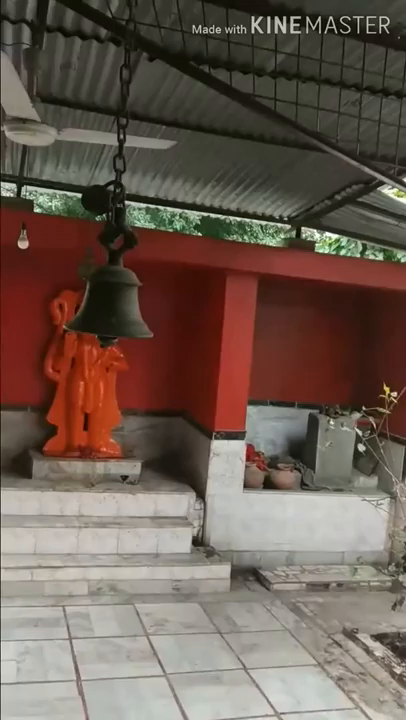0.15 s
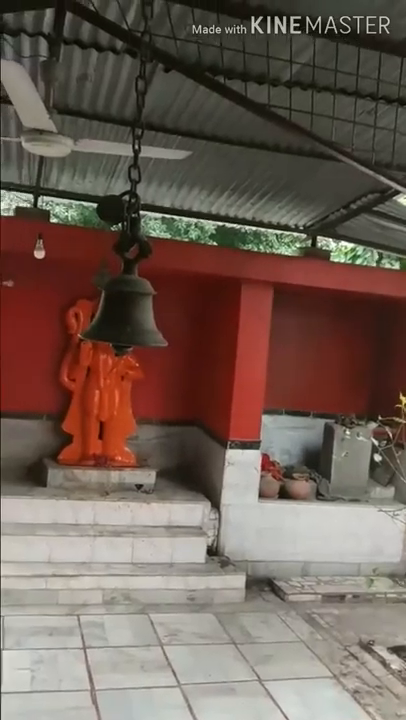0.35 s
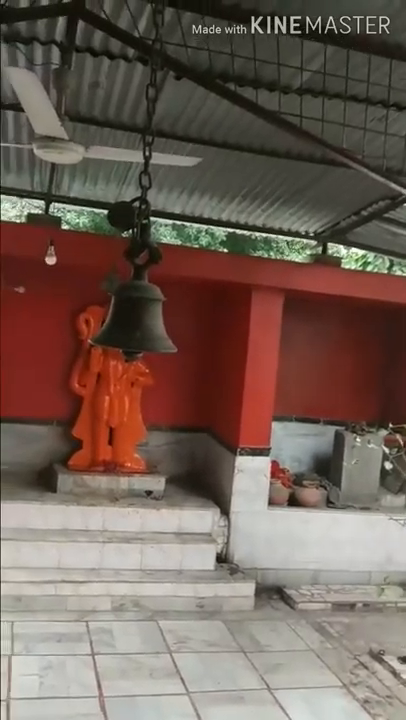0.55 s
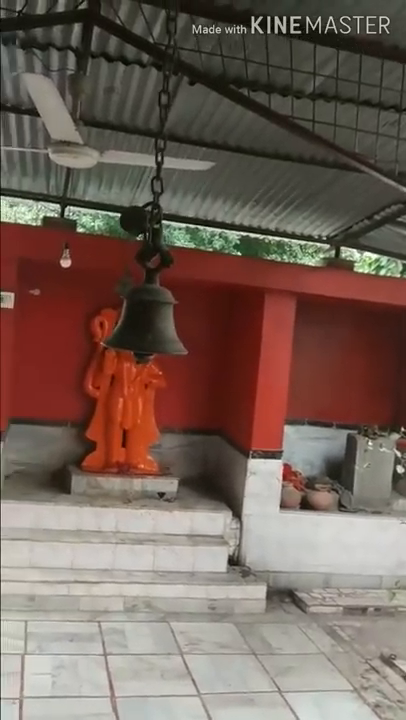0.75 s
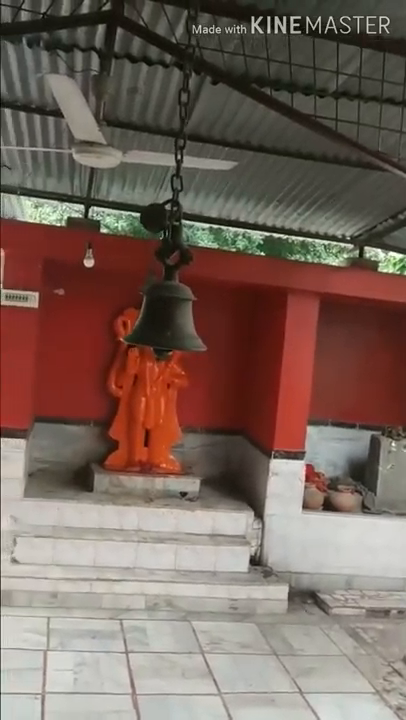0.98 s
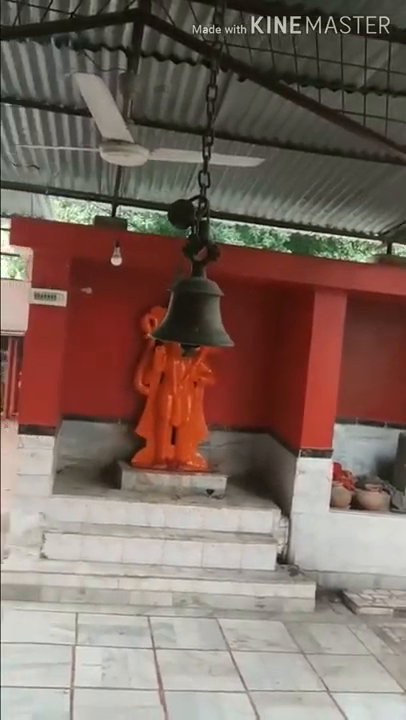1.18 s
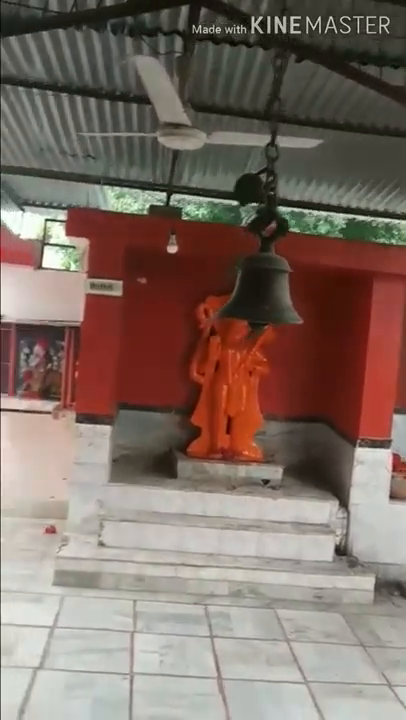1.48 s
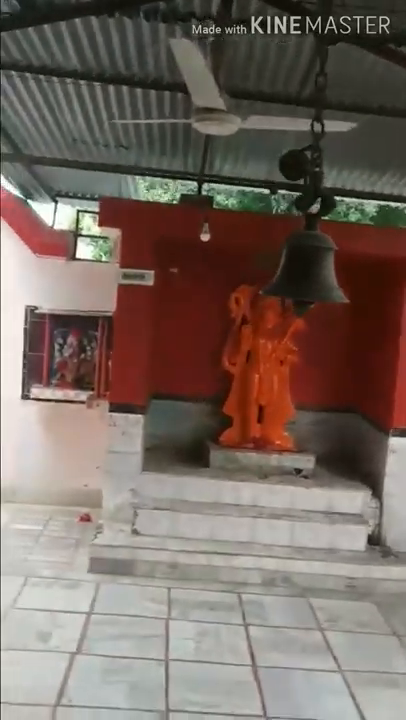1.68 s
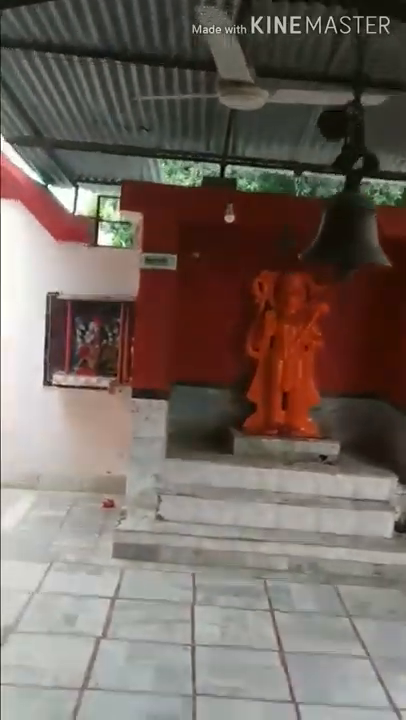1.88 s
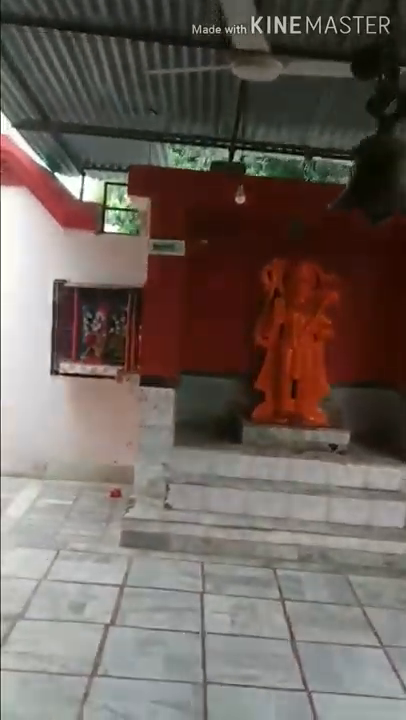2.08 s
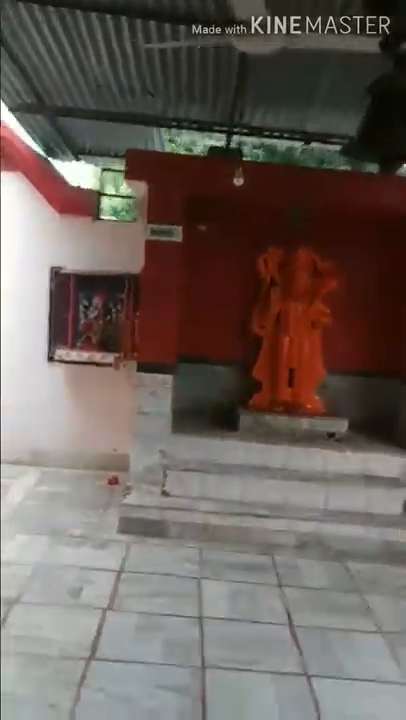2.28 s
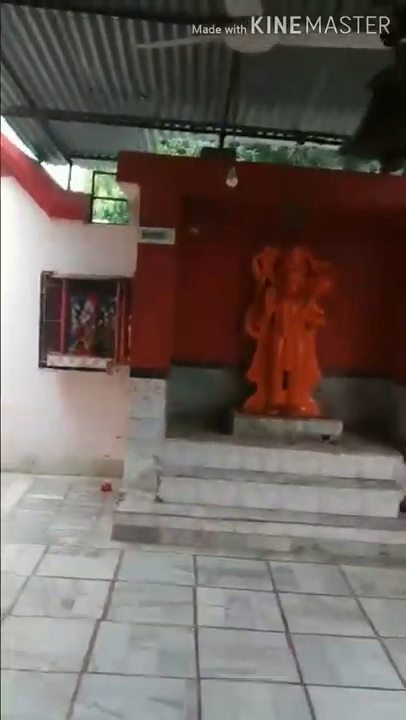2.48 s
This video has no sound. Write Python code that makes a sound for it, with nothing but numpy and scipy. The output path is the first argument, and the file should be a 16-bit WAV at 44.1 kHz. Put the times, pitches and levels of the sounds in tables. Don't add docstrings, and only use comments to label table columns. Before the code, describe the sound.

A metal temple bell is struck eight times in quick succession, bright and clanging, then rings away

```python
import sys
import numpy as np
from scipy import signal
from scipy.fft import rfft, irfft, next_fast_len
from scipy.io import wavfile
from scipy.ndimage import uniform_filter1d, minimum_filter1d, map_coordinates

SR = 44100
rng = np.random.default_rng(int(sys.argv[2]) if len(sys.argv) > 2 else 0)


def makeup_ratio(level_db):
    decades = np.asarray(level_db, float) / 20
    return 10 ** decades


def put_to_file(sound):
    columns = np.atleast_2d(sound).T
    safe = np.clip(columns, -1, 1)
    whole_steps = np.round(safe * 32767)
    wavfile.write(sys.argv[1], SR, whole_steps.astype(np.int16))


N = 116865

# (time [s], strength [dB], extra for the lowest pair [dB],
# extra for the second and third pair [dB], extra for the fourth and fifth pair [dB])
BLOWS = [
    (0.2269, -9.5, 5, 1.5, 0.5),
    (0.4658, -19, -21, -0.5, 0.5),
    (0.7506, -12, -1.5, 6, 2.5),
    (1.0235, -16, 4, 7.5, 1),
    (1.2625, -11.5, -52, 1.5, 3),
    (1.497, -16, -16, -1, 3.5),
    (1.7159, -22.5, 2, 9, 4),
    (1.892, -14, -5.5, 1, 1),
]
# (frequency [Hz], level [dB])
CONTACT_COLOUR = [(200, -33.5), (700, -9), (2200, 17), (5000, 9), (9000, 18.5), (15500, -16)]
BLOW_DB = 2.5
LAG_S = 19 / 44100


def unit(x):
    return x / np.sqrt(np.mean(x ** 2) + 1e-20)


def along(points, hz):
    f, v = np.transpose(points)
    return np.interp(np.log(hz + 1), np.log(f + 1), v)


def wobble(rate, count):
    knots = rng.standard_normal((count, 200))
    place = np.arange(0, N + 64, 64) * rate / SR
    return np.array([map_coordinates(k, [place]) for k in knots])


def filtered(x, response):
    m = next_fast_len(N + SR // 2)
    return irfft(rfft(x, m) * response(np.fft.rfftfreq(m, 1 / SR)), m)[..., :N]


def hiss(spectrum):
    return unit(filtered(rng.standard_normal((2, N)), lambda hz: makeup_ratio(along(spectrum, hz))))


def bursts(times, dbs, rises, t60):
    age = np.clip(np.arange(N) / SR - np.array(times)[:, None], 0, None)
    fade = makeup_ratio(np.array(dbs)[:, None] - 60 * age / t60)
    rise = 1 - np.exp(-age / np.array(rises)[:, None])
    return np.sum(fade * rise, 0)


def air(metal):
    # (frequency [Hz], level [dB per Hz])
    air_colour = [(15, -26.5), (25, -7.5), (108, -3.5), (137, -15), (1400, -22), (1560, -28), (2350, -26),
                  (2760, -30), (16000, -27.5)]
    # (frequency [Hz], level [dB per Hz])
    stir_colour = [(25, -4.5), (100, -2.5), (170, -8), (500, -10), (1400, -19.5), (2300, -19.5),
                   (3200, -57), (16000, -67)]
    # (frequency [Hz], likeness [0 to 1])
    likeness = [(30, .9), (150, .92), (300, .7), (700, .3)]
    air_db, stir_db, stir_follows, gust_db = -48, -33.5, 0.56, 1.2

    low = filtered(metal, lambda hz: (hz > 900) & (hz < 4500))
    low_power = np.abs(uniform_filter1d(np.mean(low ** 2, 0), size=3000))
    low_db = 10 * np.log10(low_power + 1e-9)
    both = makeup_ratio(air_db) * hiss(air_colour)
    both = both + makeup_ratio(stir_db + stir_follows * low_db) * hiss(stir_colour)

    def middle_and_side(hz):
        turn = np.arccos(np.clip(along(likeness, hz), -1, 1)) / 2
        return np.array([np.cos(turn), np.sin(turn)])

    mid, side = filtered(both, middle_and_side)
    gust = np.repeat(wobble(6.3, count=1), 64, axis=1)[:, :N]
    return makeup_ratio(gust_db * gust) * np.array([mid + side, mid - side])


def clapper():
    # (time [s], peak level [dB], rise [s], extra for the steel tones [dB])
    clinks = [
        (0.134, -53, 0.0019, 15),
        (0.2, -14, 0.00071, 11.5),
        (.69, -19.5, .03, -70),
        (1.117, -27.5, .002, 7.5),
        (1.397, -51, .002, -25),
        (1.725, -9, 0.003, -34),
        (2.3, -32.5, 0.0089, 0),
    ]
    # (frequency [Hz], level [dB], time to fade by 60 dB [s])
    steel_tones = [(930, -12, .12), (3000, -8, .05), (4616, -8, .12), (5435, -8, .1), (6300, -12, .08),
                   (8300, -10, .08), (9467, 0, .12), (11465, -6, .12), (14926, 0, .15)]
    rattle_db, rattle_s = 4.5, 0.11

    s, db, rises, ring_db = np.transpose(clinks)
    t = np.arange(N) / SR
    ring = np.zeros((2, N))
    for hz, level, t60 in steel_tones:
        tone = np.sin(2 * np.pi * (hz * t + rng.random((2, 1))))
        ring += makeup_ratio(level) * bursts(s, db + ring_db, rises, t60) * tone
    return ring + bursts(s, db + rattle_db, rises, rattle_s) * hiss(CONTACT_COLOUR)


def cracks():
    # (frequency [Hz], level [dB])
    wash_colour = [(300, -10), (1000, -3), (2300, 0), (3300, -25), (5600, -40), (7000, -14), (11000, -8),
                   (15000, -30)]
    crack_db, crack_s = 19, 0.0047
    wash_db, wash_s = -21, 0.88

    s, db = np.transpose(BLOWS)[:2]
    rises = np.full(len(s), 3e-4)
    crack = bursts(s, db + crack_db, rises, crack_s) * rng.standard_normal(N)
    crack = filtered(crack, lambda hz: makeup_ratio(along(CONTACT_COLOUR, hz)))
    crack = np.array([np.roll(crack, round(LAG_S * SR)), crack])
    wash = bursts(s, db + wash_db, rises, wash_s) * hiss(wash_colour)
    return makeup_ratio(BLOW_DB) * (crack + wash)


def struck_tone(k, hz, tone_db, t60, step):
    kept_db, scatter_db = -7, 1.5
    swell_s, swell_hz = 0.053, 3240
    ping_db, ping_s = 9.5, 0.08
    low = 1 / (1 + (hz / swell_hz) ** 4)
    state = np.zeros(len(step), complex)
    for s, blow_db, hum_db, mid_db, high_db in BLOWS:
        extra_db = ([hum_db] + [mid_db] * 2 + [high_db] * 2)[k] if k < 5 else 0
        chance = rng.standard_normal(2)
        size = makeup_ratio(BLOW_DB + blow_db + tone_db + extra_db + scatter_db * chance[0])
        size = size * np.exp(1j * chance[1])
        age = np.clip(step - s, 0, None)
        swell = 1 - np.exp(-age / (swell_s * low + 1e-4))
        ping = (1 - low) * makeup_ratio(ping_db - 60 * age / ping_s)
        ring = swell * makeup_ratio(-60 * age / t60) + ping
        state = np.where(step >= s, state * makeup_ratio(kept_db) + size * ring, state)
    return state


def bell():
    # (frequency [Hz], gap to the upper twin [Hz])
    pair_hz = [(1145.5, 7), (2651, 19), (3039, 29), (3766, 20), (4096, 23), (5976, 31), (6318, 11),
               (7378, 21), (7558, 27), (7887, 15), (8226, 14), (8904, 70), (9113, 26), (9280, 38),
               (10197, 9), (10379, 20), (10760, 8), (11068, 37), (11680, 12), (11895, 45), (12059, 25),
              (12274, 20), (12565, 15), (13226, 8), (13550, 15), (14481, 20), (14926, 34), (15180, 30)]
    # (level [dB], time to fade by 60 dB [s])
    pair_ring = [(-5.5, 4.24), (-13, 2.14), (-9, 1.414), (-7.5, 1.11), (0.5, 1.13), (-6, 1.13), (-6, 0.71),
                 (-4.5, 0.6), (-14.5, 0.96), (-24, 1.5), (-1.5, 0.42), (-17, 1.18), (-3, 0.46),
                 (-3.5, 0.53),
                 (-7, 0.69), (-19.5, .4), (-26.5, 1), (-6, 0.25), (-20, 0.64), (-20, .4), (-12.5, 0.45),
                (-17, 0.21), (-55.5, 0.21), (-47, 0.22), (-4, 0.44), (-37, 0.11), (-31, 0.43), (5, .2)]
    twin_db = [-3, 10, -9.5, 8, -8.5, -11.5, 6.5, 0.5, 1, -44, -43, 1.5, -0.5, -4, -4.5, 2, 1, 5.5, 11.5,
               -19, 8, -9, 19.5, 17, -48, -1, 22.5, -15]
    # (frequency [Hz], level [dB])
    left_over_right = [(1000, -3.5), (3000, -1), (8000, -2), (14000, 8)]
    swing_db, swing_rad, swing_rate = 4, 1, 8
    shiver_depth, shiver_rate = 0.45, 50
    port_rad = 1

    out = np.zeros((2, N))
    t = np.arange(N) / SR
    step = np.arange(0, N + 64, 64) / SR
    pairs = zip(pair_hz, pair_ring)
    for k, ((hz, gap), (db, t60)) in enumerate(pairs):
        lobes = min(1, hz / 4000)
        half_db = along(left_over_right, hz) / 2
        for twin in range(2):
            swing = makeup_ratio(lobes * swing_db * wobble(swing_rate, count=2))
            swing = swing * np.exp(1j * lobes * swing_rad * wobble(swing_rate, count=1))
            shiver = wobble(shiver_rate, count=2)
            state = struck_tone(k, hz, db + twin * twin_db[k], t60, step)
            state = state * (1 + lobes * shiver_depth * (shiver[0] + 1j * shiver[1]))
            lag = -2 * np.pi * hz * LAG_S * lobes ** 0.72
            lag = lag + lobes * port_rad * rng.standard_normal()
            ports = [makeup_ratio(half_db) * np.exp(1j * lag), makeup_ratio(-half_db)]
            tone = np.exp(2j * np.pi * (hz + twin * gap) * t)
            for side in range(2):
                strength = np.interp(t, step, state * swing[side] * ports[side])
                out[side] += (strength * tone).imag
    return out


def shrine(x):
    # (frequency [Hz], time to fade by 60 dB [s])
    echo_times = [(300, 0.17), (3000, 0.48), (12000, 0.33)]
    hz, t, z = signal.stft(rng.standard_normal((2, SR // 2)), SR, nperseg=256)
    fade = makeup_ratio(-60 * t / along(echo_times, hz)[:, None])
    tail = signal.istft(z * fade, SR, nperseg=256)[1]
    tail = tail / np.linalg.norm(tail[0])
    late = np.pad(x, ((0, 0), (300, 0)))
    return signal.fftconvolve(late, tail, axes=1)[:, :N]


def scene():
    metal = bell() + cracks() + clapper()
    echo_db = -8
    return metal + makeup_ratio(echo_db) * shrine(metal) + air(metal)


def top_cut(x):
    return signal.sosfilt(signal.butter(12, 16650, fs=SR, output="sos"), x)


def record(dry):
    # (frequency [Hz], level [dB])
    mic_curve = [(1000, 0), (8000, 0), (14500, 0), (15300, -8), (16000, -35), (16600, -80)]
    ceiling_db, squeeze, open_db_per_s = -4.5, 0.8, 191
    x = filtered(dry, lambda hz: makeup_ratio(along(mic_curve, hz)))
    peak_db = 20 * np.log10(np.abs(x).max(0) + 1e-6)
    ramp = open_db_per_s * np.arange(N) / SR
    held_db = np.maximum.accumulate(peak_db + ramp) - ramp
    over = np.clip(held_db - ceiling_db, 0, None)
    gain_db = minimum_filter1d(-squeeze * over, size=81)
    x = x * makeup_ratio(uniform_filter1d(gain_db, size=61))
    return top_cut(x)


dry = scene()
out = record(dry)
put_to_file(out)
```